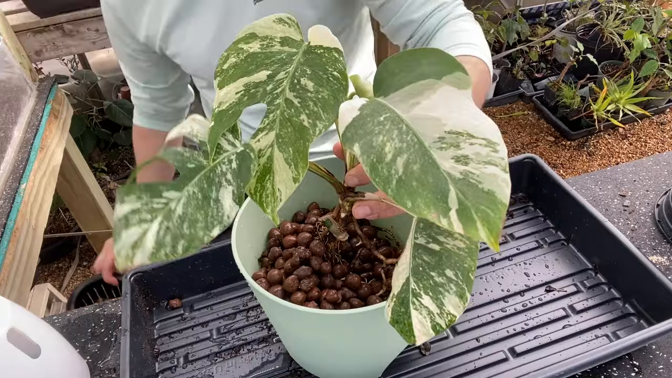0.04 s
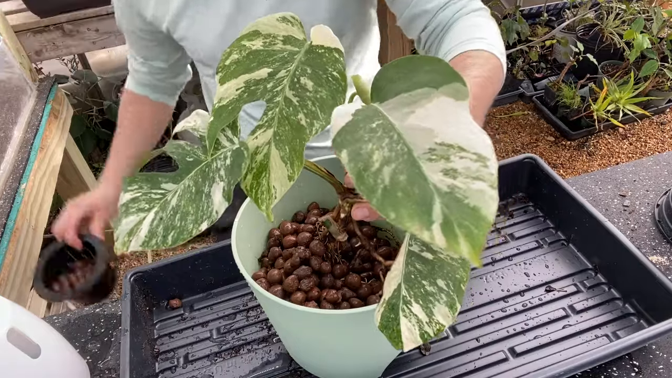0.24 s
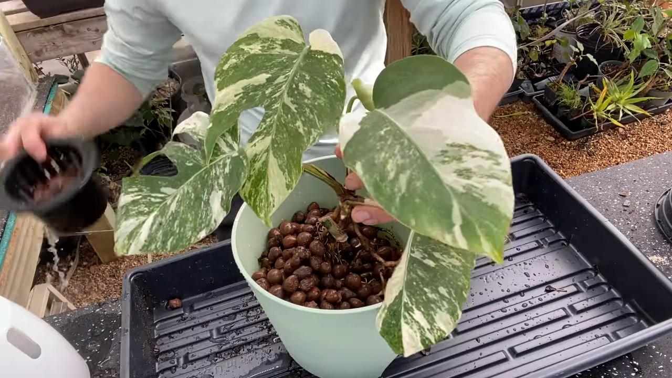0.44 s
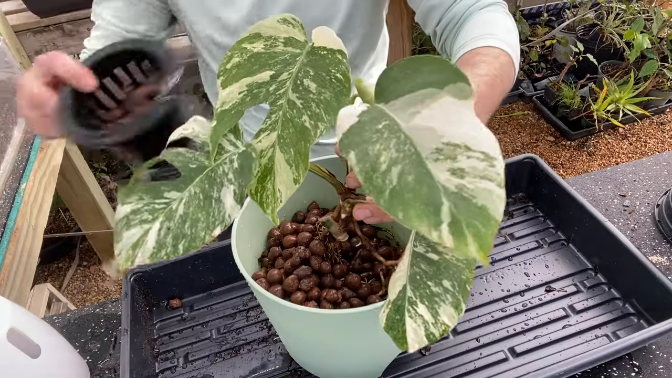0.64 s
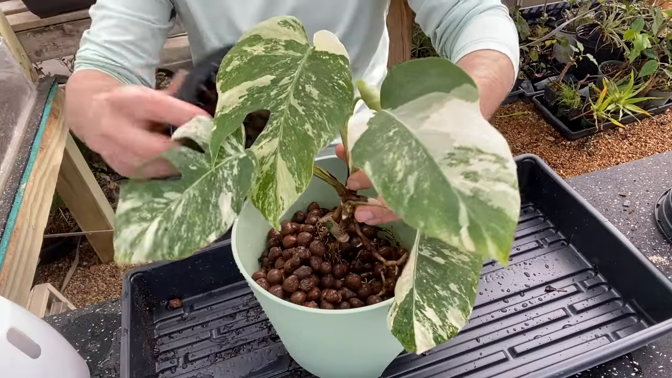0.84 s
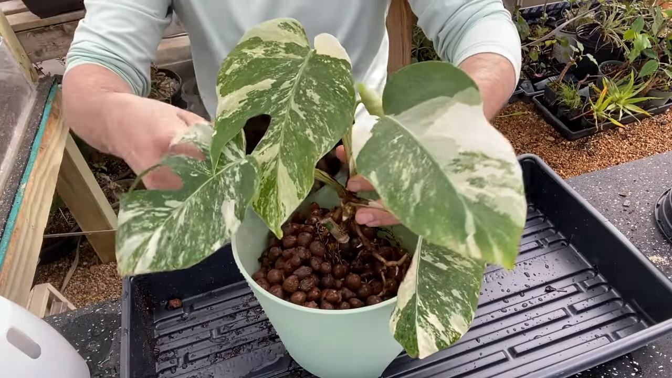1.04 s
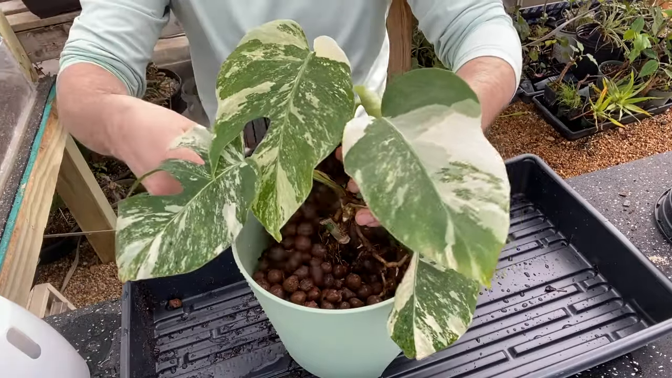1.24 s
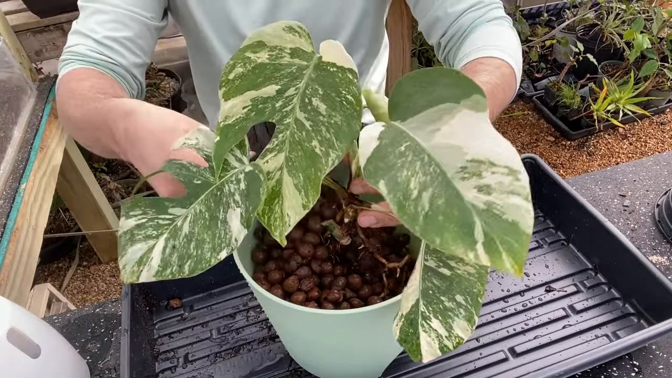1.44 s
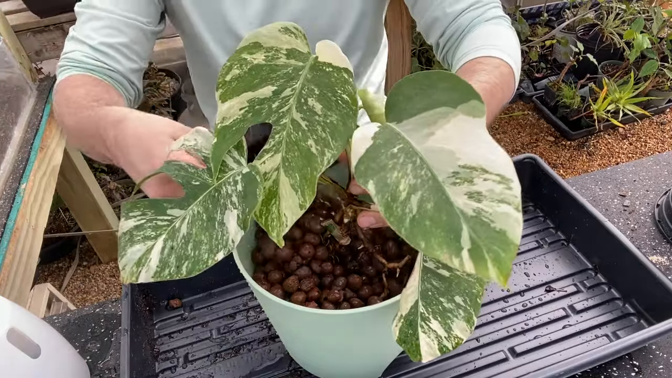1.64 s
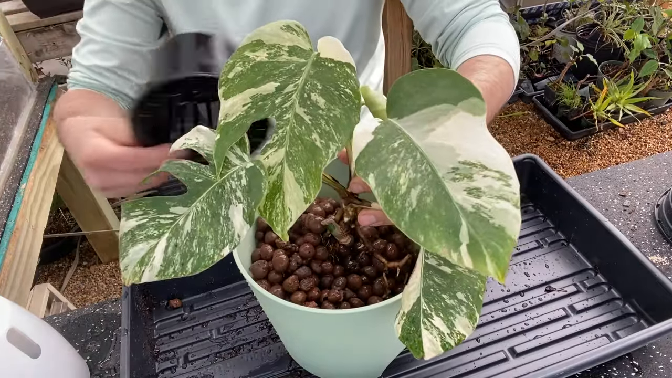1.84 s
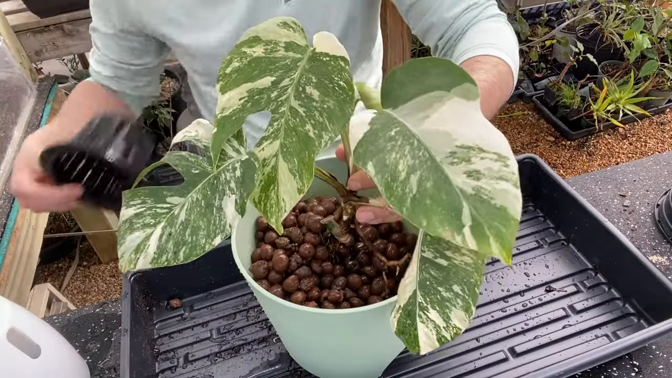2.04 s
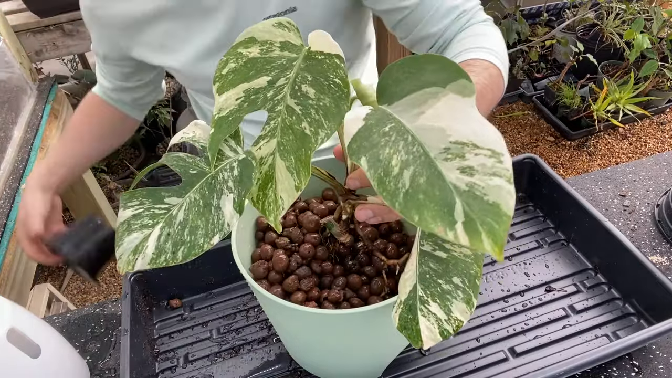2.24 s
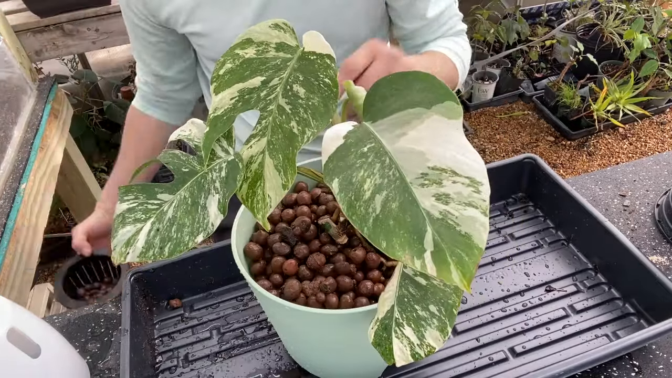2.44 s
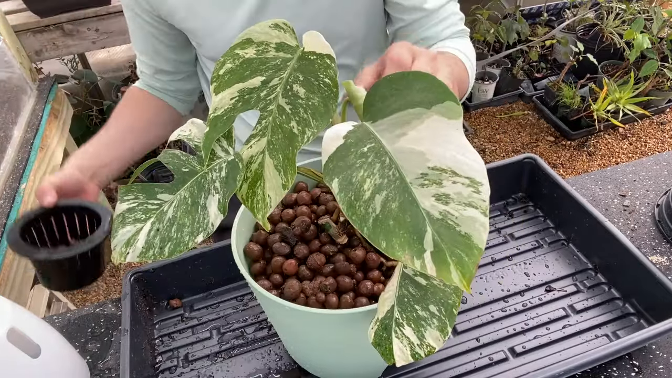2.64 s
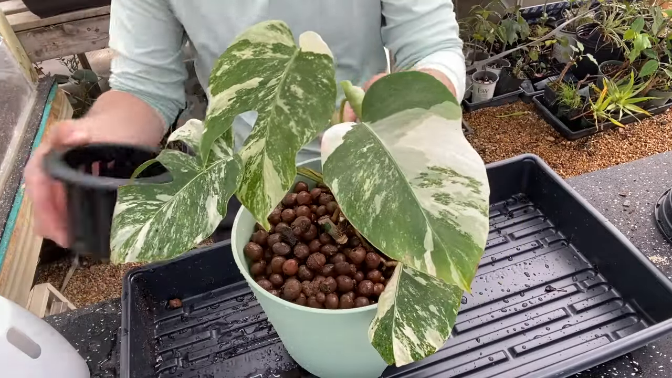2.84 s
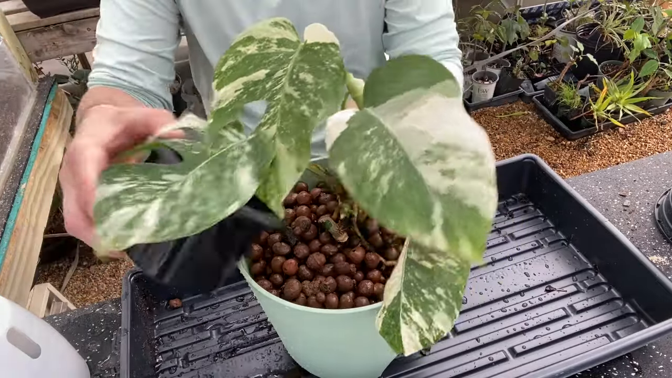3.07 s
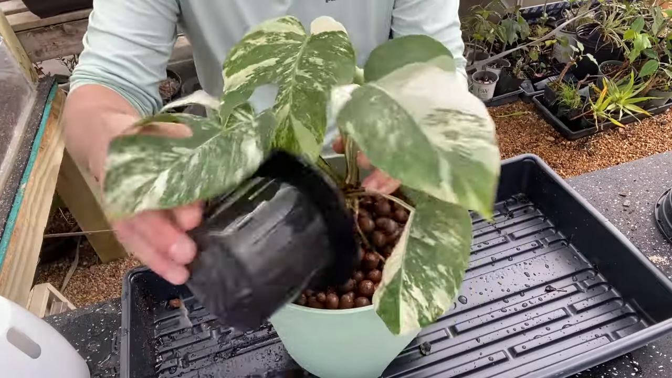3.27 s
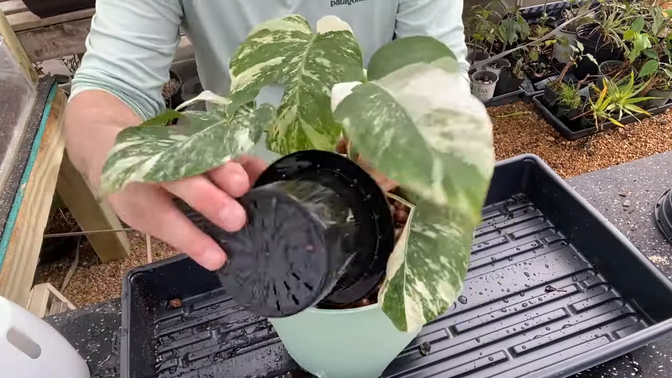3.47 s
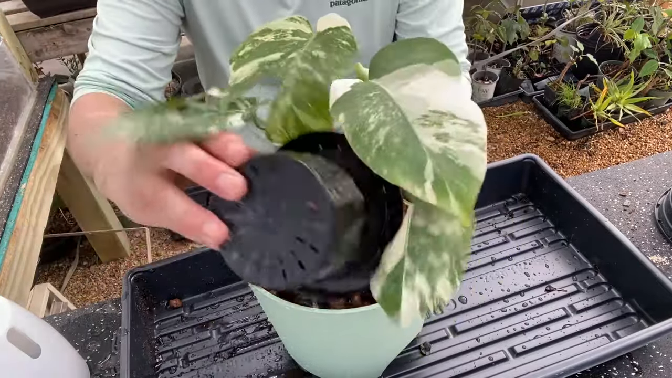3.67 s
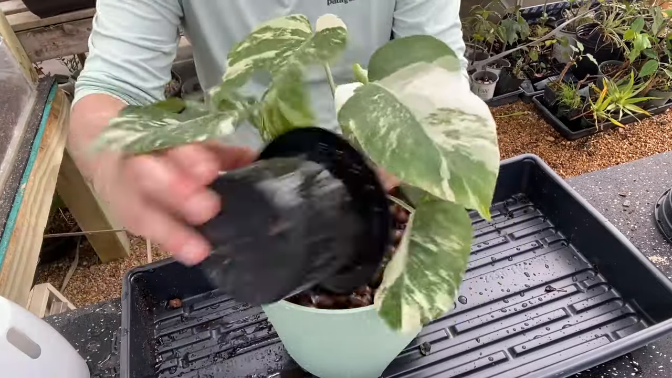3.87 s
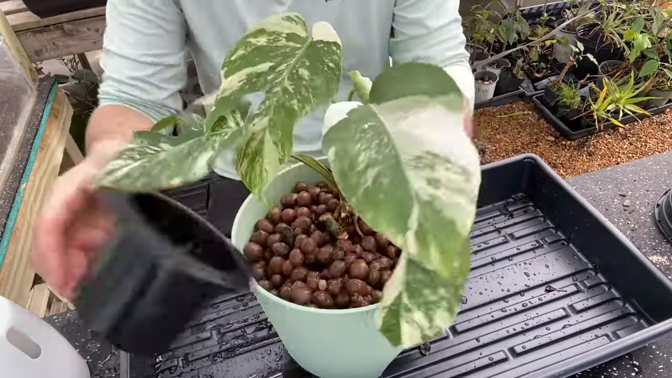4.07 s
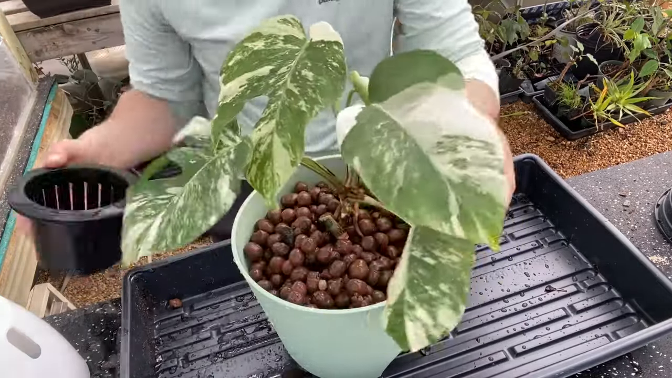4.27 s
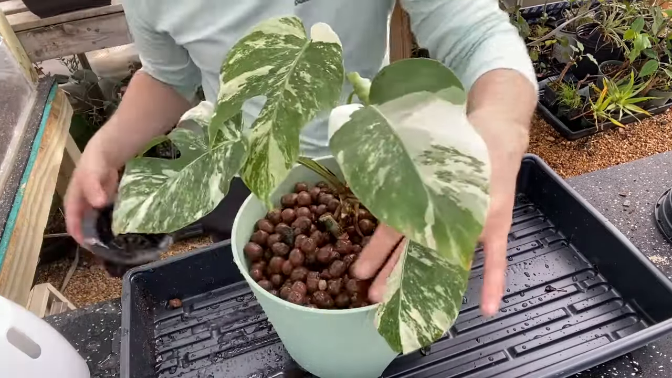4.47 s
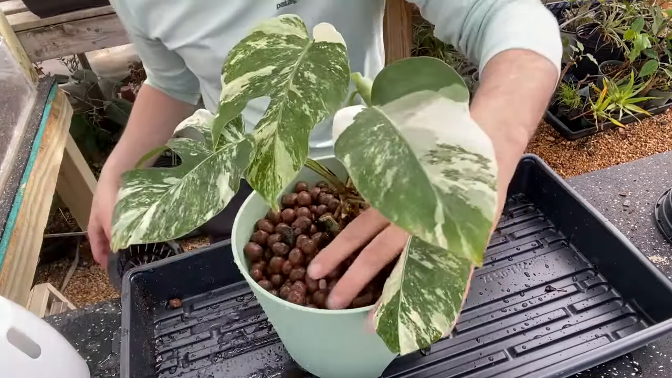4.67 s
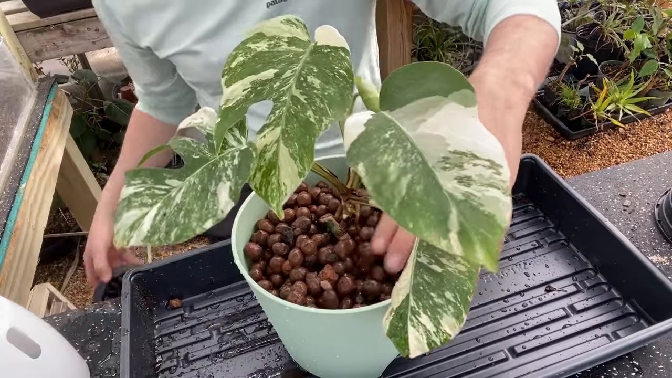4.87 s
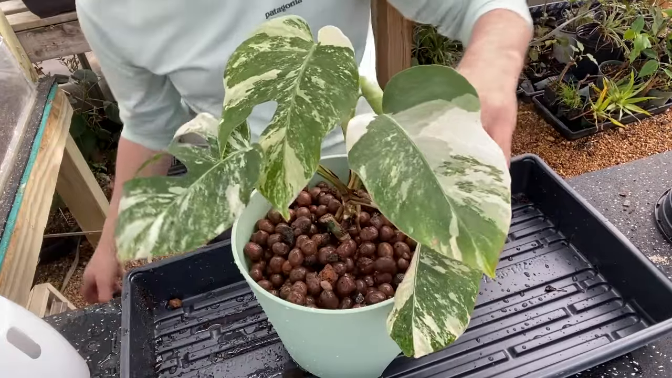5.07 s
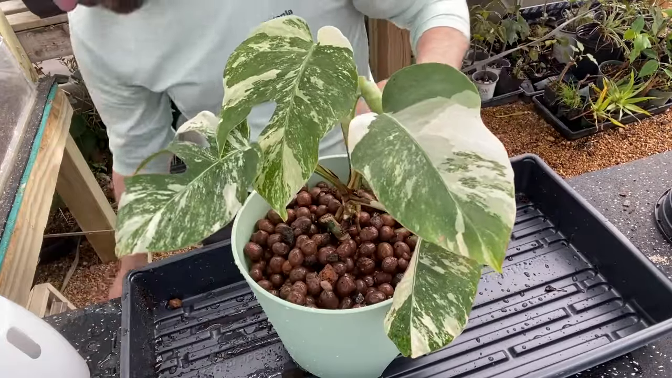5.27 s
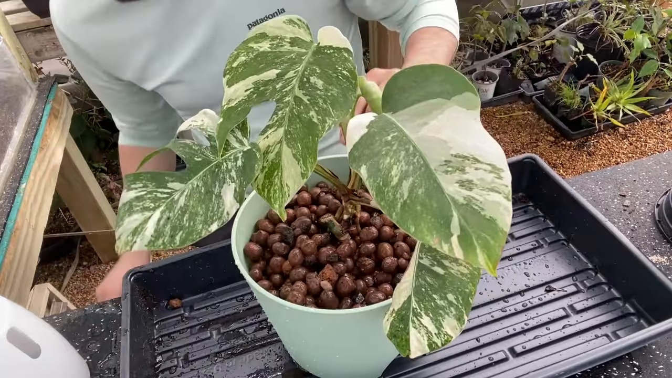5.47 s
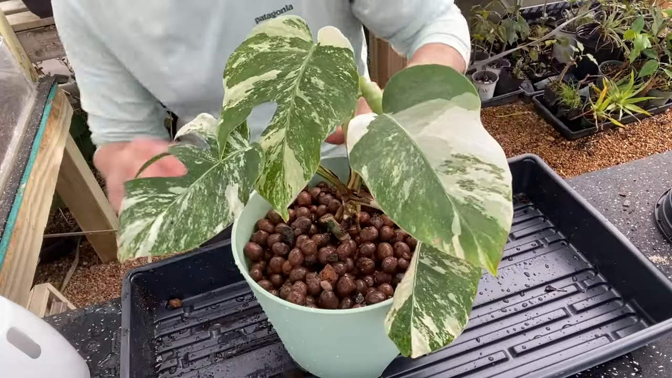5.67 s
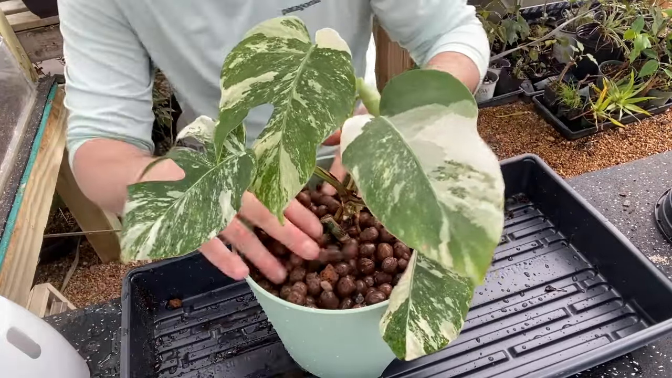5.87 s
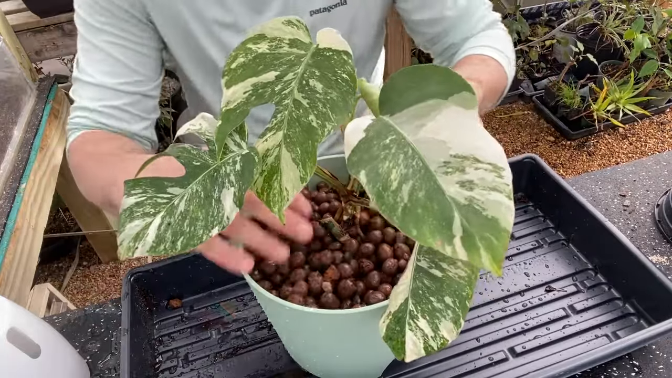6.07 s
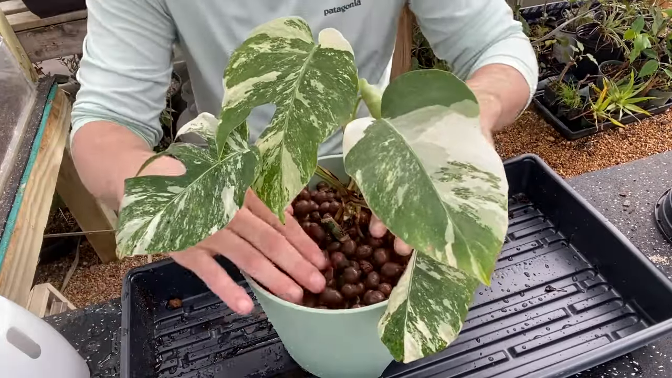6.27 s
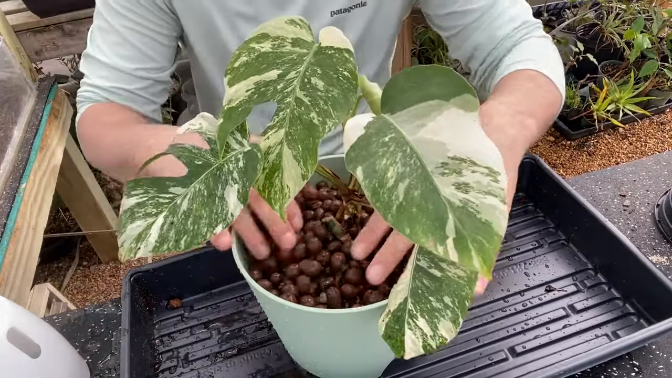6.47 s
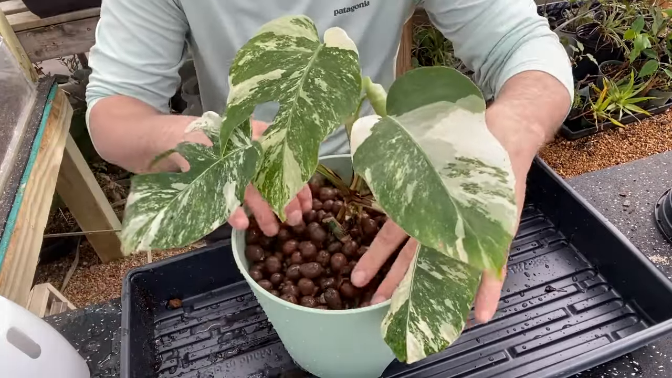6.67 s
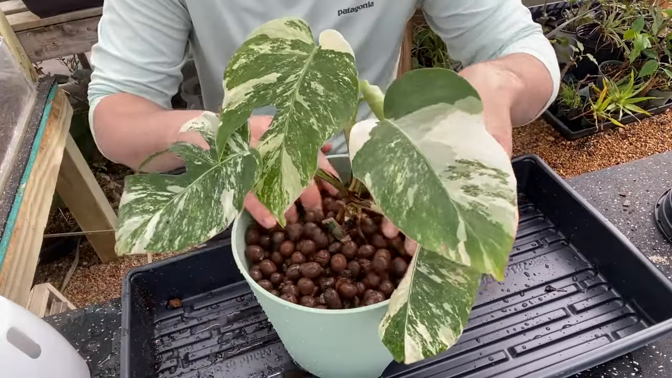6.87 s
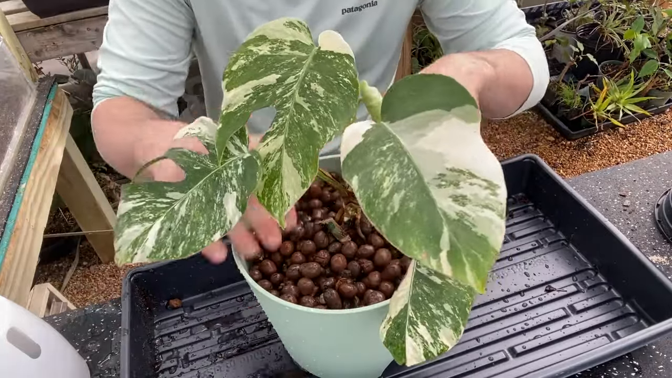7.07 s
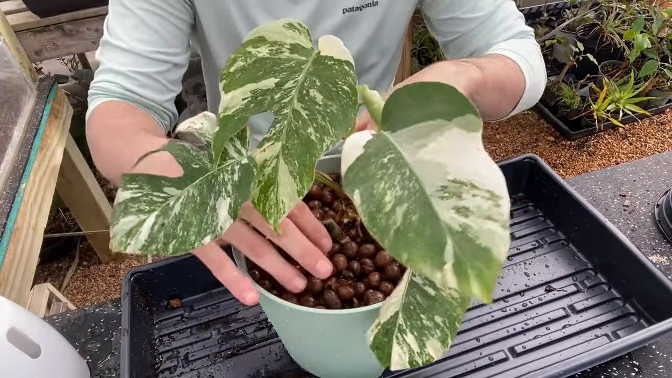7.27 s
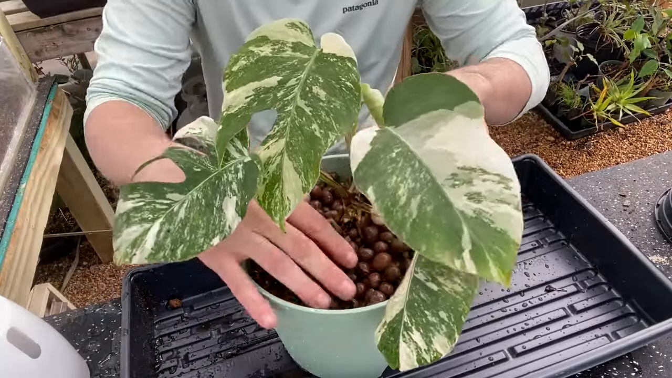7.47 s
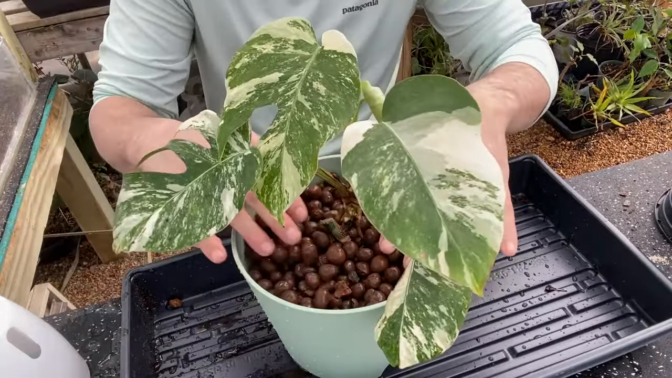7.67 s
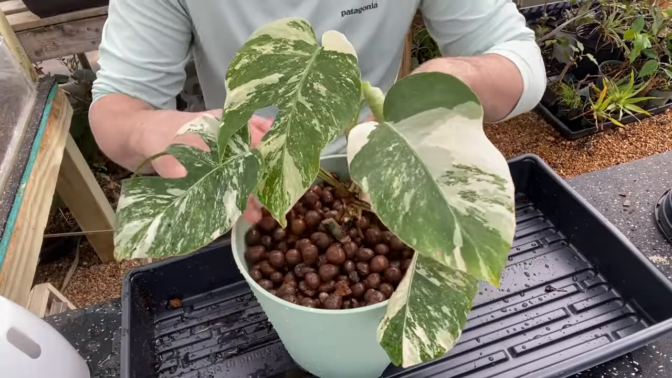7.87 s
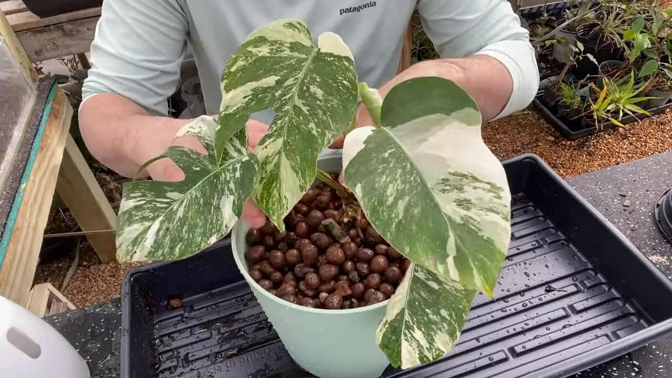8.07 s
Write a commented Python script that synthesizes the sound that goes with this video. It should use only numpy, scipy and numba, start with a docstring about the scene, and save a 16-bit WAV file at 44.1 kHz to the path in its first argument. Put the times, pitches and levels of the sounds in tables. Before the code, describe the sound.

Water drips and trickles from a scoop of wet clay pebbles, which then pour into a plastic plant pot with a dense, clicking rattle. After a few more drips comes a second, shorter pour. The scoop scrapes and bumps a bucket with a hollow knock, then a hand presses and shifts the pebbles in short, crunchy strokes. Everything is close, in a greenhouse with faint outdoor hiss and a low bench rumble.

```python
"""Wet clay pebbles are scooped from a bucket while water drains and drips on the left.
From 0.8 s and again from 3.2 s they pour into a plastic plant pot; each collision ticks in the pebble
and rings the pot wall and the packed bed. At 4.6 s the scoop scrapes the bucket rim; near 5.4 s it bumps
and drains again. Then a hand presses the pebbles down. Throughout, the bench rumbles with each movement
over a faint outdoor hiss; a phone with two microphone ports stands close by in a greenhouse."""
import sys
import numpy as np
from scipy import signal
from scipy.fft import rfft, irfft, next_fast_len
from scipy.io import wavfile
from numba import njit

SR = 44100
rng = np.random.default_rng(int(sys.argv[2]) if len(sys.argv) > 2 else 0)


def generate_wav(signal):
    """Clip the signal to [-1, 1] and save it as 16-bit WAV at the path in sys.argv[1]."""
    frames = np.transpose(np.atleast_2d(signal))
    scaled = np.clip(frames, -1, 1) * 32767
    pcm = np.round(scaled).astype(np.int16)
    wavfile.write(sys.argv[1], SR, pcm)


N = 358079
T = np.arange(N) / SR
WALL_LIKENESS, BED_LIKENESS, PEBBLE_LIKENESS = .7, .55, .95  # between the two ports, 0-1
# pebble resonances: pitch_hz, width_hz, gain_db
PEBBLE_MODES = [(6210, 1340, 15.8), (7184, 240, 7), (7870, 160, 6.4), (8350, 250, 6), (8895, 230, 6.5),
                (9970, 190, 8.3), (11490, 350, 12.5), (12640, 770, 0.5)]


def undb(db):
    """Decibels to amplitude."""
    return 10 ** (np.asarray(db) / 20)


def unit(x):
    """Scale to RMS 1."""
    return x / np.sqrt(np.mean(x ** 2))


def ring(x, hz, width_hz):
    """Damped resonance; a unit click rings with peak near 1."""
    radius, angle = np.exp(-np.pi * width_hz / SR), 2 * np.pi * hz / SR
    return signal.lfilter([.5, 0, -.5], [1, -2 * radius * np.cos(angle), radius * radius], x)


@njit
def wandering_ring(x, cos_angle, radius):
    """Damped resonance whose pitch changes every 1024 samples."""
    y = np.zeros_like(x)
    for c in range(x.shape[0]):
        for i in range(2, x.shape[1]):
            feedback = 2 * radius * cos_angle[i >> 10] * y[c, i - 1] - radius * radius * y[c, i - 2]
            y[c, i] = .5 * (x[c, i] - x[c, i - 2]) + feedback + 1e-18
    return y


def strike(time_s, level_db, modes, likeness, spot_db, pitch_hz=None, wander=.005):
    """Clicks into modes; where a blow lands sets how hard each rings and which way it radiates."""
    out, at = 0, np.clip((time_s * SR).astype(int), 0, N - 1)
    for hz, width_hz, gain_db in modes:
        spot, aim, polarity = rng.standard_normal((len(time_s), 3)).T
        size = np.sign(polarity) * undb(level_db + gain_db + spot_db * spot)
        if pitch_hz is not None:
            octaves_off = np.nan_to_num(np.abs(np.log2(hz / pitch_hz)))
            size = size * undb(-7 * octaves_off)
        pan = np.sign(aim) * np.sqrt((1 - likeness) / (1 + likeness))
        clicks = np.array([np.bincount(at, size * (1 + side * pan), N) for side in (1, -1)])
        # the heap keeps shifting, so no resonance stays put
        cos_angle = np.cos(2 * np.pi * hz / SR * (1 + wander * rng.standard_normal(N // 1024 + 1)))
        mode = wandering_ring(clicks, cos_angle, np.exp(-np.pi * width_hz / SR))
        out = out + ring(mode, hz, hz / 2) * np.pi * hz / SR  # soft contact: gradual build-up
    return out


def add_glide(out, start_s, level_db, hz, t60_s, glide, rise_s, jitter_rad=0.):
    """Add a hollow decaying ring; its pitch moves by 2 * glide * hz over t60_s."""
    at, t = int(start_s * SR), np.arange(int(t60_s * SR)) / SR
    phase = 2 * np.pi * hz * t * (1 + glide * t / t60_s)
    phase += jitter_rad * np.cumsum(rng.standard_normal(len(t)))
    tone = np.sin(phase) * undb(level_db - 60 * t / t60_s) * (1 - np.exp(-t / rise_s))
    out[at:at + len(t)] += tone[:N - at]


def envelope_db(t, start_s, length_s, level_db, swell_db_per_s, rise_20db_s, release_db_per_s):
    """Attack, steady swell or fade, release."""
    age_s = t - start_s
    held_db = level_db + swell_db_per_s * np.clip(age_s, 0, length_s)
    attack_db = 20 * np.minimum(age_s, 0) / rise_20db_s
    return held_db + attack_db - release_db_per_s * np.maximum(age_s - length_s, 0)


def motion(t):
    """Summed level of all pebble movements and their power-weighted wall, tick and bench shares, in dB."""
    # flow from the tipped scoop, one list per pour: time_s, level_db, wall_db, tick_db, bench_db
    pours = [
        [(0.82, -63.5, 1.5, -19.5, -2), (1.07, -39, -6, -12, -15), (1.25, -33.5, -5, -6.5, -11.5),
         (1.5, -31.5, -4, -10, -17), (1.65, -36, -4, -8, -10.5), (1.79, -40, 0, -10, -11),
         (1.94, -51.5, 0, -11.5, 1), (2.05, -59, 2, -19.5, -4), (2.7, -82, 8, -7, -10.5)],
        [(3.18, -71, 10, -14, 17), (3.33, -50, -1, -9.5, -12), (3.6, -31.5, -3, -10.5, -22),
         (3.76, -36.5, -2, -7.5, -18.5), (3.93, -47.5, 0.5, -9.5, -3), (4.1, -58, 0.5, -11.5, 1),
         (4.36, -84, 2, -12, 17.5), (4.54, -65.5, -11, -18, -19)],
    ]
    # hand or scoop in the pebbles: start_s, length_s, level_db, swell_db_per_s, wall_db, tick_db, bench_db
    strokes = [(0.0, 1, -48.5, -14.5, -1.5, -12, -8), (2.905, 0.22, -70, 87, 1, -13.5, 2),
               (4.667, 0.3, -50.5, 35.5, -0.5, -11.5, -9), (5.386, 0.019, -53, 163, 10.5, -19, -13),
               (5.53, 0.45, -66, -16, 10, -22.5, -21), (5.876, 0.18, -48.5, 77, -1.5, -13, -7),
               (6.229, 0.15, -39, -29, 0.5, -13, -3.5), (6.488, 0.09, -38, -40, -3.5, -8, -6.5),
               (6.703, 0.2, -39.5, -52, -0.5, -13.5, -10), (6.913, 0.56, -36, -62, -3, -11.5, -5.5),
               (7.245, 0.12, -39, -47, -1, -14.5, 0.5), (7.458, 0.14, -41, -102, -0.5, -17, -5),
               (7.548, 0.11, -49.5, 70, 0, -8, -5), (7.791, 0.21, -40.5, -40, -2.5, -10, -7),
               (8.025, 0.071, -30.5, -230, -5, -13.5, -2.5)]
    # a few pebbles slip and come to rest: start_s, level_db, tick_db
    slips = [(2.145, -43, -19), (2.346, -41.5, -19), (2.709, -64, -27), (3.336, -37.5, -22),
             (4.132, -38, -15.5), (5.114, -46.5, -12), (5.436, -29.5, -21), (6.644, -32.5, -10.5),
             (6.908, -30, -9), (7.644, -36.5, -19)]
    moves = []
    for time_s, level_db, *shares_db in map(np.transpose, pours):
        flow_db = np.interp(t, time_s, level_db, -120, -120)
        moves.append([flow_db] + [np.interp(t, time_s, share) for share in shares_db])
    for row in strokes:
        moves.append([envelope_db(t, *row[:4], rise_20db_s=.0098, release_db_per_s=144.5), *row[4:]])
    for start_s, level_db, tick_db in slips:
        slip_db = envelope_db(t, start_s, 0, level_db, 0, rise_20db_s=.011, release_db_per_s=366)
        moves.append([slip_db, -2, tick_db, -7.5])
    powers = [undb(2 * move[0]) for move in moves]
    total = sum(powers)
    shares_db = [sum(power * move[k] for power, move in zip(powers, moves)) / total for k in (1, 2, 3)]
    return 10 * np.log10(total), *shares_db


def air(level_db=-61.5, lull_half_width_s=.035):
    """Faint outdoor hiss that dips briefly three times."""
    # hiss spectrum: freq_hz, relative_db
    spectrum = [(88, -52), (150, -19.5), (396, -8), (1050, -5), (5200, -29.5), (8500, -31.5), (10800, -55),
                (22000, -120)]
    # dips: time_s, depth_db
    lulls = [(2.59, -8), (2.86, -6), (4.33, -10.5)]
    freq_hz, relative_db = np.transpose(spectrum)
    hz = np.fft.rfftfreq(N, 1 / SR) + 1
    shape = undb(np.interp(np.log(hz), np.log(freq_hz), relative_db))
    noise = rng.standard_normal(N) + rng.standard_normal((2, N))
    dip_db = sum(db * np.exp(-((T - time_s) / lull_half_width_s) ** 2) for time_s, db in lulls)
    return unit(irfft(rfft(noise) * shape, N)) * undb(level_db + dip_db)


def greenhouse(x, t60_s=.089, level_db=-8, cutoff_hz=3570, rise_s=.0015):
    """Short dull tail from panes, trays and ground, different at each port."""
    t = np.arange(int(.5 * SR)) / SR
    tail = rng.standard_normal((2, len(t))) * undb(-60 * t / t60_s) * np.minimum(t / rise_s, 1)
    tail = signal.lfilter(*signal.butter(1, cutoff_hz, fs=SR), tail)
    tail /= np.sqrt(np.sum(tail ** 2, axis=1, keepdims=True))
    return undb(level_db) * signal.fftconvolve(x, tail, axes=1)[:, :N]


def bench(settle_s=.022, low_rest_db=-77, low_follow_db=-9.5, upper_rest_db=-64, upper_follow_db=-10):
    """Hands and pot shake the bench; a resting rumble swells with the weight of each movement."""
    # bench resonances: pitch_hz, width_hz, gain_db
    modes = [(53.4, 13.6, 5), (78.7, 21, 0), (102, 35, -9), (176, 260, -25)]
    t = T[::100]
    level_db, _, _, bench_db = motion(t)
    pole = np.exp(-(t[1] - t[0]) / settle_s)
    shake = np.interp(T, t, signal.lfilter([1 - pole], [1, -pole], undb(level_db + bench_db)))
    push = rng.standard_normal(N) + .36 * rng.standard_normal((2, N))
    low, *upper = (undb(db) * unit(ring(ring(push, hz, width_hz), hz, 2 * width_hz))
                   for hz, width_hz, db in modes)
    low_gain = undb(low_rest_db) + undb(low_follow_db) * shake
    upper_gain = undb(upper_rest_db) + undb(upper_follow_db) * shake
    return low * low_gain + sum(upper) * upper_gain


def water(bubbles_per_s=400, mid_hz=799, spread_oct=.209, t60_cycles=31, trim_db=9.5, after_s=.25):
    """Bubbles of many sizes ring near the surface as the scoop drains; a few clear drips fall."""
    # draining: start_s, length_s, level_db, swell_db_per_s
    drains = [(0.0, 0.56, -56.5, 2.5), (2.452, 0.56, -79.5, 6.5), (5.392, 0.17, -55, -75.5),
              (5.593, 0.17, -58, -21)]
    # single drips: start_s, level_db, pitch_hz, t60_s, glide
    drips = [(0.088, -27, 775, 0.025, 0.19), (0.513, -34, 1500, 0.067, 0.18), (0.547, -29, 450, 0.09, 0.3),
             (0.616, -33, 1142, 0.084, 0.21), (0.705, -36, 900, 0.08, 0.125),
             (2.496, -46.5, 1388, 0.12, -0.00054), (2.739, -53.5, 1914, 0.17, -0.072),
             (3.084, -24, 480, 0.03, 0.083)]
    out = np.zeros(N)
    for drain in drains:
        start_s, span_s = drain[0], drain[1] + after_s
        for time_s in start_s + span_s * rng.random(int(bubbles_per_s * span_s)):
            hz = mid_hz * 2 ** rng.normal(0, spread_oct)
            flow_db = envelope_db(time_s, *drain, rise_20db_s=1, release_db_per_s=84)
            level_db = flow_db + trim_db + rng.normal(0, 3)
            add_glide(out, time_s, level_db, hz, t60_cycles / hz, glide=.2, rise_s=.003)
    for drip in drips:
        add_glide(out, *drip, rise_s=.008, jitter_rad=.03)
    return np.array([out, np.roll(out, 9)])  # reaches the left port first


def bumps():
    """The scoop bumps pot or bucket: dull hollow thuds that sag in pitch."""
    # thuds: start_s, level_db, pitch_hz, t60_s
    thuds = [(4.137, -39.5, 124.5, 0.2), (4.139, -26.5, 288, 0.0168), (4.185, -37, 105, 0.11),
             (5.385, -33.5, 634, 0.21), (5.44, -26, 415, 0.04)]
    out = np.zeros(N)
    for start_s, level_db, pitch_hz, t60_s in thuds:
        add_glide(out, start_s, level_db, pitch_hz, max(t60_s, .02), glide=-.1, rise_s=.002)
    return out


def scrape(start_s=4.555, length_s=.058, drive_db=-47.5, count=60):
    """The scoop drags on the bucket rim: a short run of stick-slip clicks."""
    # scrape resonances: pitch_hz, width_hz, gain_db
    modes = [(1085, 240, -4.5), (2590, 1900, 12.5)]
    when, weakness = rng.random((count, 2)).T
    return strike(start_s + length_s * when, drive_db - 4.1 * weakness, modes, WALL_LIKENESS, spot_db=1.4)


def ticks(trim_db=-15.5):
    """Two pebbles meet clear of the pot: only their own bright ring sounds."""
    # lone clicks: time_s, level_db
    clicks = [(0.064, -34), (0.2167, -32), (0.4424, -31), (0.597, -31), (1.2261, -16), (1.2526, -11),
              (1.318, -17.5), (3.5474, -19.5), (3.8646, -20), (6.2467, -21.5), (7.636, -22.5), (7.692, -24)]
    time_s, level_db = np.transpose(clicks)
    return strike(time_s, level_db + trim_db, PEBBLE_MODES, PEBBLE_LIKENESS, spot_db=2.5, wander=.046)


def rattle(count=11000, slide_chance=.033, surge_decay=.866, surge_db=10, trim_db=-12, spot_db=5):
    """Dense blows of uneven size; small avalanches start at once and settle gradually."""
    time_s = np.sort(rng.random(count)) * N / SR
    size, chance, force = rng.random((count, 3)).T
    surge = signal.lfilter([1], [1, -surge_decay], (chance < slide_chance) * force)
    flow_db, wall_db, tick_db, _ = motion(time_s)
    size_db = -2.5 * np.log(size + .0029)
    level_db = flow_db + trim_db + size_db + surge_db * np.tanh(surge)
    return np.broadcast_arrays(time_s, level_db, wall_db, tick_db, spot_db, np.nan)  # no favoured pitch


def knocks(count=10, bounce_s=.00016, fade_db=-2, first_db=4, trim_db=-9, wall_db=-9, spot_db=2.5):
    """A falling pebble hits, then it and its neighbours rebound ever weaker and further apart."""
    # loud hits: time_s, level_db, favoured_pitch_hz, tick_db
    hits = [(0.951, -30, 2180, -14), (1.037, -24, 2100, -24), (1.0978, -16.5, 1980, -12),
            (1.152, -24.5, 2400, -4), (1.2061, -18, 2100, -4), (1.265, -15, 1190, -12),
            (1.3528, -13.5, 2030, -23), (1.3748, -18, 2080, -26), (1.444, -16, 2370, -13),
            (1.5136, -16.5, 2590, -7), (1.5307, -13, 1210, -14), (1.653, -9.5, 1400, -17),
            (1.7874, -19, 1950, -13), (1.9702, -22.5, 1260, -17), (2.057, -35.5, 1600, -21),
            (2.1177, -29.5, 1290, -17), (2.146, -18, 1170, -38), (2.239, -38.5, 2600, -22),
            (2.294, -32, 1970, -17), (2.343, -23.5, 1820, -21), (2.972, -38, 1200, -14),
            (3.0844, -34, 1330, -35), (3.266, -36.5, 1110, -1.5), (3.3396, -25.5, 1110, -13),
            (3.4777, -18, 3200, -6.5), (3.503, -24, 2440, -15), (3.6248, -20, 1480, -17),
            (3.738, -17.5, 2870, -26), (3.772, -15.5, 2470, -36), (3.938, -25.5, 2800, -17),
            (3.966, -25, 880, -29), (4.132, -26, 816, -17), (4.2243, -28, 900, -26),
            (4.6896, -29.5, 1070, -24), (4.8235, -25.5, 1040, -10), (4.9227, -24.5, 3390, -22),
            (4.978, -25.5, 2350, -34), (6.227, -16, 1070, -17.5), (6.5764, -22, 2100, -15),
            (6.6408, -9.5, 1860, -28), (7.0728, -24, 1190, -12), (7.106, -29, 2580, -7.5),
            (7.253, -20.5, 1110, -6.5), (7.455, -18.5, 1210, -23), (7.621, -25, 2900, -19)]
    time_s, level_db, pitch_hz, tick_db = np.repeat(np.transpose(hits), count, axis=1)
    bounce = np.tile(np.arange(count), len(hits))
    time_s += (.5 + rng.random(len(bounce))) * bounce_s * bounce ** 2
    level_db += trim_db + fade_db * bounce + first_db * (bounce == 0)
    return np.broadcast_arrays(time_s, level_db, wall_db, tick_db - 6.5, spot_db, pitch_hz)


def collisions(time_s, level_db, wall_db, tick_db, spot_db, pitch_hz, filled_s=3.7, emptying_db_per_s=8):
    """Blows ring the pot wall, the packed bed, the tipped scoop, the filled pot and the pebbles."""
    # resonances: pitch_hz, width_hz, gain_db
    wall_modes = [(176, 150, -12), (339, 166, -12), (533, 83, -5.5), (785, 282, 5.5), (1200, 200, 1),
                  (1455, 660, 8.5)]
    bed_modes = [(2030, 340, 5), (2470, 170, -1), (2738, 190, -1.5), (2995, 286, 0.5), (3585, 460, 2),
                 (4240, 890, 6.5), (5260, 970, 4)]
    scoop_modes = [(1197, 87, 4)]
    filled_modes = [(513, 26, -12.5), (1119, 158, -2.5)]
    # the tipped scoop rings more as it empties: start_s, end_s, end_share_db
    tips = [(0.998, 2.198, -5.5), (3.3, 4.1, -23.5)]
    wall = strike(time_s, level_db + wall_db, wall_modes, WALL_LIKENESS, spot_db, pitch_hz, wander=.081)
    bed = strike(time_s, level_db, bed_modes, BED_LIKENESS, spot_db, pitch_hz, wander=.07)
    scoop_share = 1e-6
    for start_s, end_s, end_share_db in tips:
        tipped = (time_s > start_s) & (time_s < end_s)
        scoop_share += tipped * undb(end_share_db - emptying_db_per_s * (end_s - time_s))
    scoop_db = level_db + 20 * np.log10(scoop_share)
    scoop = strike(time_s, scoop_db, scoop_modes, WALL_LIKENESS, spot_db, pitch_hz)
    filled_db = np.where(time_s > filled_s, level_db, -np.inf)
    filled = strike(time_s, filled_db, filled_modes, WALL_LIKENESS, spot_db, pitch_hz)
    pebbles = strike(time_s, level_db + tick_db, PEBBLE_MODES, PEBBLE_LIKENESS, spot_db, wander=.042)
    return wall + bed + scoop + filled + pebbles


def scene():
    """Close sources and their greenhouse tail, over bench rumble and hiss."""
    blows = np.hstack([rattle(), knocks()])
    near = collisions(*blows) + water() + bumps() + scrape() + ticks()
    return near + greenhouse(near) + bench() + air()


def record(dry, shelf_hz=9850, shelf_db=-15, cutoff_hz=15500):
    """The ports differ in phase and level; the top octave is weak and then cut."""
    # left port relative to right: freq_hz, lead_rad, balance_db
    ports = [(0, 0, -1.5), (1700, -1.5, -.7), (4100, -2.3, -3), (5500, -2.9, -4), (6200, -1.6, -6),
             (7900, 0, 0), (10700, 3.2, 0), (12400, 6, 0)]
    freq_hz, lead_rad, balance_db = np.transpose(ports)
    size = next_fast_len(N + 4096)
    hz, side = np.fft.rfftfreq(size, 1 / SR), np.array([[.5], [-.5]])
    treble_db = shelf_db / (1 + np.exp((shelf_hz - hz) / 150))
    gain = undb(treble_db + side * np.interp(hz, freq_hz, balance_db))
    phase = side * np.interp(hz, freq_hz, lead_rad)
    stereo = irfft(rfft(dry, size) * gain * np.exp(1j * phase), size)[:, :N]
    return signal.sosfilt(signal.ellip(10, .2, 80, cutoff_hz, fs=SR, output="sos"), stereo)


dry = scene()
out = record(dry)
generate_wav(out)
```